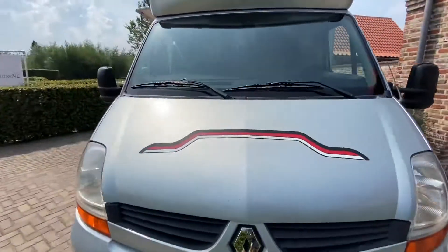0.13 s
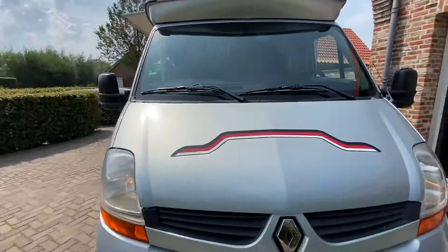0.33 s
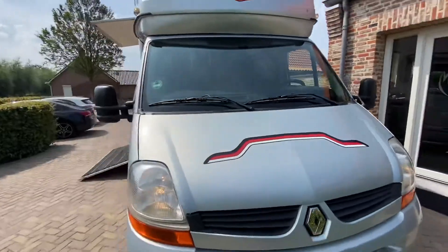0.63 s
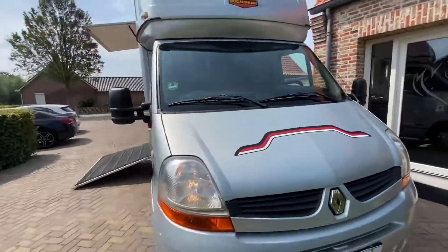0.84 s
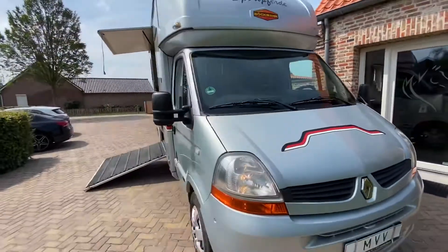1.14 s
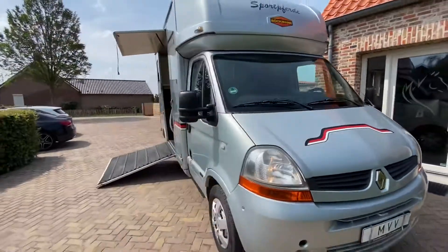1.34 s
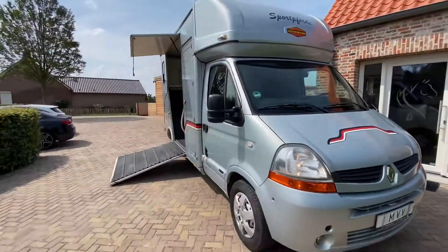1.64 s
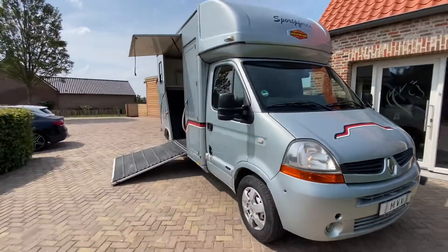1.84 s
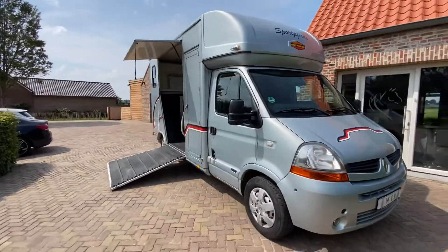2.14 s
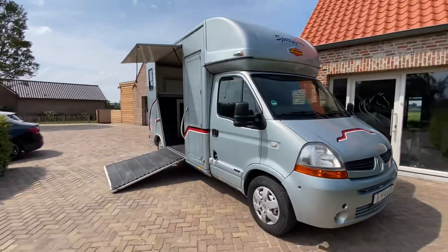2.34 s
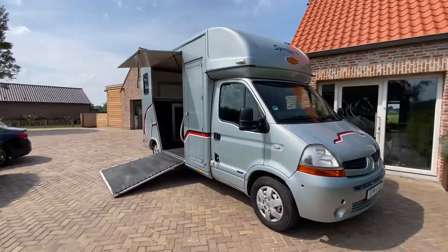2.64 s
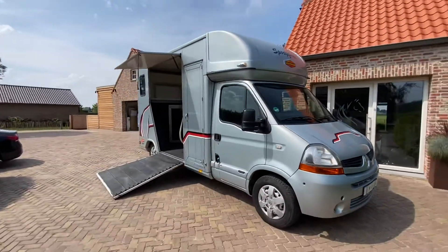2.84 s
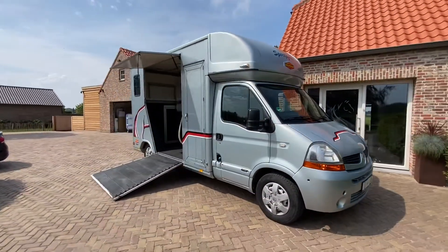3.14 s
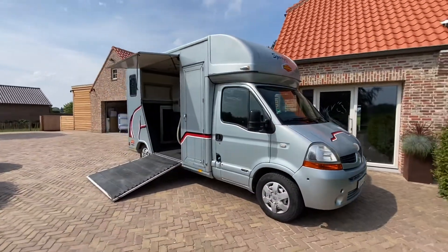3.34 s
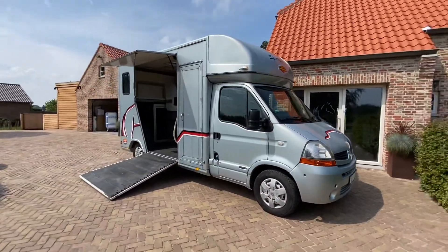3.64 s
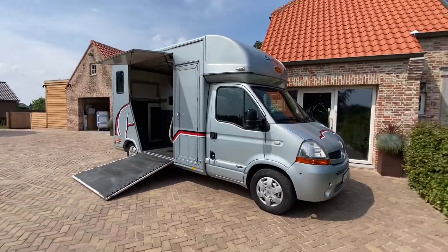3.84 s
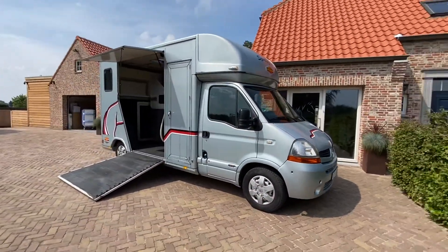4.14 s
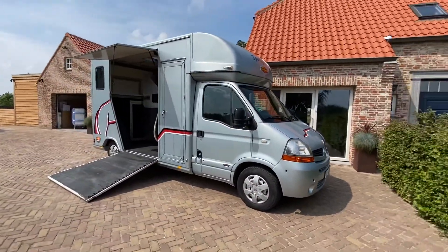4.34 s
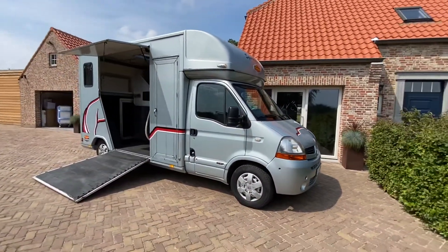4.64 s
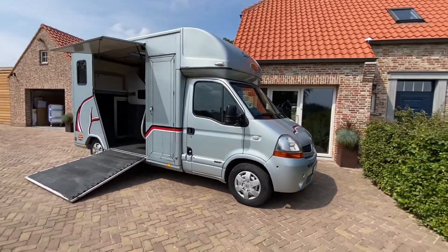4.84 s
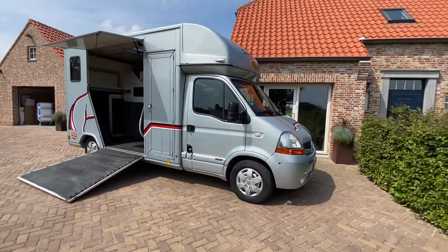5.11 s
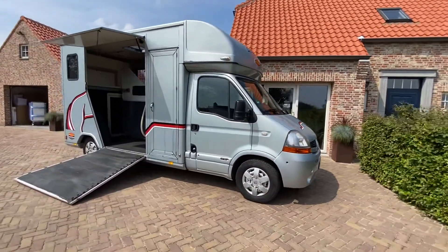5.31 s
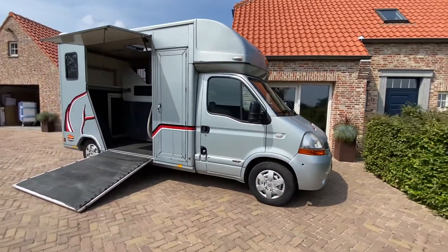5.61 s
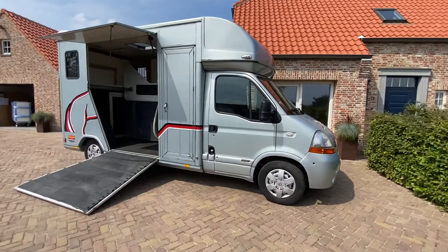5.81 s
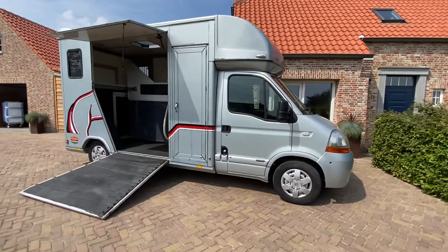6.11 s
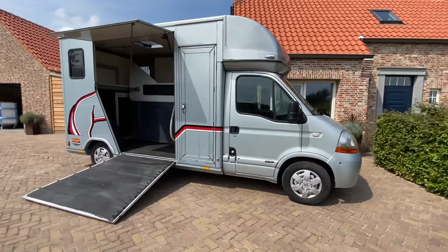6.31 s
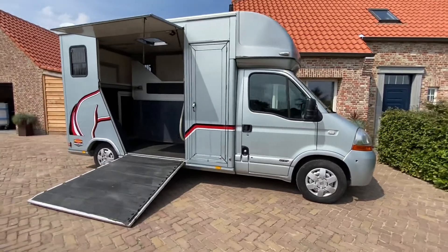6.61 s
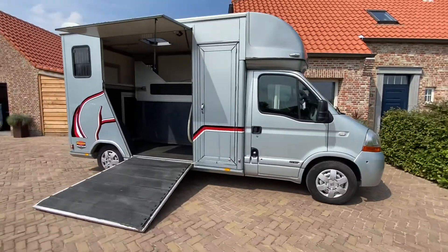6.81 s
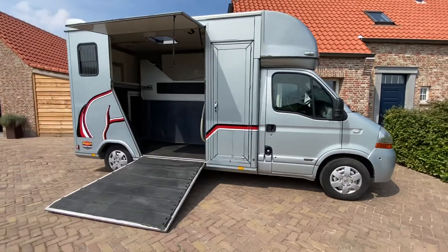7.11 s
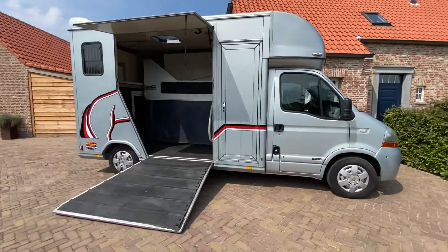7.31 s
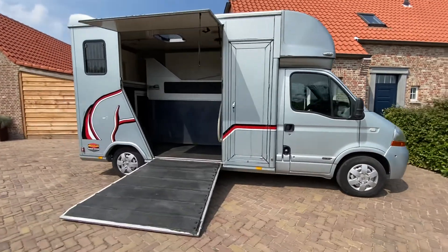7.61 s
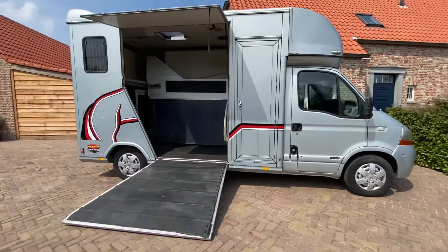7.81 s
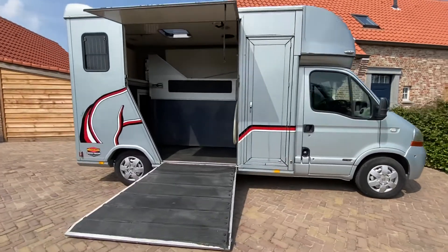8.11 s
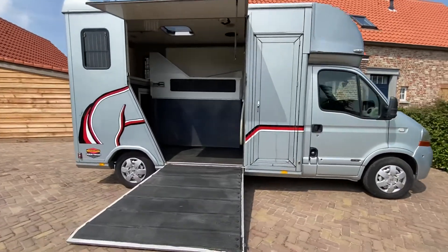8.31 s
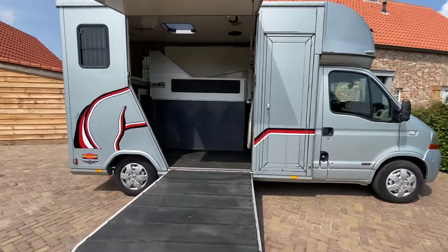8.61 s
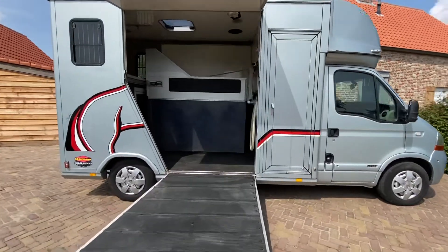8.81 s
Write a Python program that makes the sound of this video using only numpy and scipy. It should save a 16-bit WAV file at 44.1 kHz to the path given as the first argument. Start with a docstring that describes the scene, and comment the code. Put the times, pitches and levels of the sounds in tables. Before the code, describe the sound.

A four-cylinder diesel van idles at about 800 rpm throughout, roughly 27 firings a second, each a small boom with metallic clatter and injector hiss. At 0 s the portable stereo microphone is close to the bonnet: loud, rattly and bright, with a sharp gritty click, scuff and hard knock around 0.1 s. Low wind rumble buffets each side separately, with gusts at 0.1 and 0.8-1.45 s, then stops. A thin fluttering pulley whine near 1270 Hz sings from 0.5 to 1.5 s. From 1.3 to 3 s the engine recedes and a hollow throb, nearly seven per second, emerges, rising slightly in pitch later. Gritty steps scuff and click near 1.7, 2.4, 2.9, 3.4 and 3.8 s, with dull knocks at 2.4, 3.86 and 4.2 s. Quieter steps follow at 5.9, 6.5 and 7.1 s; small knocks and scuffs cluster at 7.7-8.5 s, and a last click-scuff comes at 8.8 s, the idle continuing.

```python
"""On a brick yard a four-cylinder diesel van idles while someone walks from its bonnet round to its side.
Every firing booms and clatters: tones locked to the crankshaft, and noise that swells with each ignition.
Once a cycle a resonance gives a hollow throb; a knock and a pulley whine are strongest near the bonnet.
Gusts rumble on the microphone at first as low noise, apart at each port.
Shoes scuff and click on gritty paving: friction noise and ringing grains, with short hollow knocks."""
import sys
import numpy as np
from scipy import signal
from scipy.fft import rfft, irfft, next_fast_len
from scipy.io import wavfile

SR = 44100
rng = np.random.default_rng(int(sys.argv[2]) if len(sys.argv) > 2 else 0)


def unload_audio(sound):
    """Save the sound as a 16-bit wav file, at the path given as the first command line argument."""
    columns = np.transpose(np.atleast_2d(sound))
    # keep every value between -1 and 1, then stretch to whole-number steps
    steps = np.round(np.clip(columns, -1, 1) * 32767)
    wavfile.write(sys.argv[1], SR, steps.astype(np.int16))


N = 394694
TIME_S = np.arange(N) / SR
PADDED = next_fast_len(N, True)          # samples in a spectrum
SIDES = np.array([[.5], [-.5]])          # shares a left-right difference between the two ports

IDLE_RPM = 799.1
CYCLE_HZ = IDLE_RPM / 120                # a four-stroke cycle takes two revolutions

# Strength of the four firings, one per cylinder. Each entry: relative level in dB.
CYLINDER_DB = [-6.5, -7.5, -6.5, -7.5]
# Level difference of the two microphone ports. Each row: frequency in Hz, left over right in dB.
LEAN_DB = [(60, -1.5), (99, -2), (160, -1.5), (270, -0.5), (450, -3.5), (740, -5.5), (1220, -6), (2010, -5),
           (3330, 2), (5500, 6.5), (9080, -0.5), (15000, 0.5)]
# Phase difference of the two microphone ports. Each row: frequency in Hz, left's lead in radians.
LEAD_RAD = [(60, -0.16), (250, -0.49), (480, -1.69), (1000, -2.02), (1700, -1.4), (2700, -1.02),
            (5000, -1.56), (14000, -1)]


def from_db(db):
    """Decibels to gain."""
    return 10 ** (np.asarray(db) / 20)


def rms_one(x):
    """Scale so that the centre of the stereo image has rms 1."""
    centre = np.atleast_2d(x).mean(axis=0)
    return x / np.sqrt(np.mean(centre ** 2) + 1e-20)


def in_time(rows):
    """Each column of a curve table at every sample."""
    s, *columns = np.transpose(rows)
    return [np.interp(TIME_S, s, column) for column in columns]


def at_hz(points, hz):
    """Read a table on a log-frequency axis."""
    table_hz, values = np.transpose(points)
    return np.interp(np.log(hz + 1e-9), np.log(table_hz), values)


def drift(rate):
    """Smooth chance with a spread near 1; rate is random points a second."""
    knots = rng.standard_normal(int(N / SR * rate) + 2)
    return np.interp(TIME_S * rate, np.arange(len(knots)), knots)


def bins():
    """Frequencies of the padded spectrum in Hz."""
    return np.arange(PADDED // 2 + 1) * SR / PADDED


def colour(spectrum):
    """Gain per frequency, falling steeply beyond the ends of the table."""
    hz = bins() + 1
    skirts = np.minimum(hz / spectrum[0][0], 1) * np.minimum(spectrum[-1][0] / hz, 1)
    return from_db(at_hz(spectrum, hz)) * skirts ** 8


def noise(gain, repeating=0):
    """Coloured noise as the two ports hear it: a direct part with a phase lag, and a diffuse part."""
    # How alike the ports hear. Each row: frequency in Hz, direct share of the power from 0 to 1.
    likeness = [(50, 0.85), (270, 0.92), (500, 0.77), (1100, 0.81), (2000, 0.95), (4000, 0.31),
                (9000, 0.52), (14000, 0.52)]
    hz = bins()
    alike = np.clip(at_hz(likeness, hz), 0, 1)
    source = rms_one(rng.standard_normal(N) + repeating)
    direct = rfft(source, PADDED) * np.exp(1j * SIDES * at_hz(LEAD_RAD, hz))
    diffuse = rfft(rng.standard_normal((2, PADDED)))
    both = np.sqrt(alike) * direct + np.sqrt(1 - alike) * diffuse
    leaning = from_db(SIDES * at_hz(LEAN_DB, hz))
    return rms_one(irfft(both * gain * leaning, PADDED)[:, :N])


def tone(turns, hz):
    """A sine of rms 1 ahead of the ports' level difference; turns is its running phase."""
    angle = (2 * np.pi * (turns % 1) + SIDES * at_hz(LEAD_RAD, hz)).astype(np.float32)
    return np.sqrt(2) * np.sin(angle) * from_db(SIDES * at_hz(LEAN_DB, hz))


def beam(at_s, spread_s, fade_db=11.0):
    """A part is loudest as the listener passes the spot that it faces."""
    off_axis = (TIME_S[::100] - at_s) / spread_s   # one value per 100 samples
    return np.repeat(from_db(-fade_db * np.log1p(off_axis ** 2)), 100)[:N]


def engine_tones(cycles):
    """Exhaust pulses and buzzing panels hold lines locked to the crankshaft; equal lines share a phase."""
    # Exhaust boom, twice a firing. Each row: time in seconds, level in dB.
    boom = [(0, -34), (1.3, -40.5), (1.55, -53), (2, -48), (2.25, -43.5), (5, -51.5), (6.3, -56.5),
            (7.9, -44.5), (8.95, -41.5)]
    # Buzzing parts, each loudest at its own spot along the walk.
    # Each row: multiple of the cycle rate, level in dB, loudest at in seconds, spread in seconds.
    harmonics = [(4, -53.5, .43, 4.5), (11, -56, 3, 1.6), (12, -44, .9, .6), (12, -52, 2.6, 2.7),
                 (12, -53.5, 7.3, 2.2), (16, -52, 6.3, 1.8), (20, -57, 6.9, 3), (23, -53, 3.6, 3),
                 (34, -39.5, .45, .45), (34, -51, 6.5, .9), (34, -51.5, 8.5, .9), (40, -49, .9, 1.2),
                 (40, -48.5, 6.2, 2.6), (44, -56, 2.6, 2.3), (48, -48.5, 2.3, 1.7), (52, -46, .25, .5),
                 (52, -51, 2.6, 2.6), (56, -49, .2, .8), (56, -56.5, 6.2, 3), (66, -61, 7.8, 2),
                 (76, -49, .3, .8), (76, -52, 3.8, 2.5), (96, -56.5, 4.8, 1.8), (112, -61, 4, 1.4)]
    standing_wave_db, standing_waves_per_s = 1.8, 2.5   # the lines swell and fade gently
    phases = rng.random(200)
    order = 2 * len(CYLINDER_DB)
    out = from_db(in_time(boom)[0]) * tone(order * cycles + phases[order], order * CYCLE_HZ)
    for order, level_db, at_s, spread_s in harmonics:
        swell_db = standing_wave_db * drift(standing_waves_per_s)
        gain = from_db(level_db + swell_db) * beam(at_s, spread_s)
        out = out + gain * tone(order * cycles + phases[order], order * CYCLE_HZ)
    return out


def firing_gate(cycles, delay, rise, fall, rest, uneven_db, pattern=CYLINDER_DB):
    """Each firing swells and dies over a steady rest; times are shares of the firing interval."""
    firings = len(pattern) * cycles - delay + len(pattern)
    which, age = firings.astype(int), firings % 1
    chance_db = uneven_db * rng.standard_normal(N // 100)[which]
    strength = from_db(np.take(pattern, which, mode="wrap") + chance_db)
    return rms_one(rest + strength * (1 - np.exp(-age / rise)) * np.exp(-age / fall))


def carried(source):
    """Gain of an engine noise along the walk: it loses a fixed amount each time the distance doubles."""
    # The walk away from the engine bay. Each row: time in seconds, distance in metres.
    walk = [(0, 1.17), (.3, 1.13), (1.25, 1.86), (2.1, 2.94), (3, 3.63), (5.3, 3.85), (7.3, 5.3),
            (8.95, 5.6)]
    near_db, loss_db = source
    distance_m = np.maximum(in_time(walk)[0], .1)
    return from_db(near_db - loss_db * np.log2(distance_m))


def shifting(spectrum, repeating, depth_db, spacing_hz):
    """Countless small resonances make the colour uneven; its peaks and dips wander between two patterns."""
    knots = np.tanh(rng.standard_normal(4000))
    ripple = from_db(depth_db * np.interp(bins() / spacing_hz, np.arange(len(knots)), knots))
    peaks = noise(colour(spectrum) * ripple, repeating)
    dips = noise(colour(spectrum) / ripple, repeating)
    turn = 1.3 * drift(2.5)
    return np.cos(turn) * peaks + np.sin(turn) * dips


def tapping():
    """Each ignition sets off a bunch of metal taps, uneven in strength, that start at once and die fast."""
    # How hard each cylinder knocks. Each entry: relative level in dB.
    tap_cylinder_db = [0, -2.5, .5, .5]
    # Contacts bunched after each ignition. Each row: share of the firing interval, relative level in dB.
    taps = [(.04, -7), (.17, -6), (.36, -7.5)]
    decay_s, jitter_s, uneven_db = .008, .001, 1.1
    rest = 1.2   # steady rattle relative to the rms of the taps
    firing_s = 1 / (len(CYLINDER_DB) * CYCLE_HZ)
    starts, hits = np.arange(0, N / SR, firing_s), np.zeros(N + SR)
    chance = np.clip(rng.standard_normal(len(starts)), -2, 1)
    firing_db = np.resize(tap_cylinder_db, len(starts)) + uneven_db * chance
    for share, level_db in taps:
        late, strong = rng.standard_normal((2, len(starts)))
        at_s = np.abs(starts + share * firing_s + jitter_s * late)
        tap_db = level_db + firing_db + uneven_db * np.minimum(strong, 2)
        hits[(at_s * SR).astype(int)] += from_db(tap_db) ** 2
    power = signal.lfilter([1], [1, -np.exp(-2 / (decay_s * SR))], hits[:N] + 1e-18)
    return rms_one(np.sqrt(rest ** 2 + power / power.mean()))


def engine_rings():
    """Shaken parts ring in narrow bands, their strength and phase wandering at the pace of their width."""
    # Ringing engine parts. Each row: frequency in Hz, width in Hz, level in dB ahead of the wandering,
    # loudest at in seconds, spread in seconds.
    rings = [(802, 30, -40, .15, .27), (660, 110, -48, 4.1, 2.3), (691.5, 100, -53, 7.8, 2.2),
             (1041, 250, -44, .45, 1.4), (1550, 300, -45.5, .15, .4), (1290, 70, -48, .6, .5),
             (1046, 180, -56, 5.6, 1.4), (1295, 55, -59.5, 4.6, 2.9), (4350, 68, -64.5, .75, 1.5),
             (4850, 400, -67, 12, 13)]
    diffuse = .3   # share of the power that reaches each port on its own
    out = 0
    for hz, width_hz, level_db, at_s, spread_s in rings:
        gain = from_db(level_db) * beam(at_s, spread_s)
        for quarter in (0, 1 / 4):   # two carriers a quarter turn apart let the phase wander too
            shared, *own = (drift(2 * width_hz) for _ in range(3))
            wander = np.sqrt(1 - diffuse) * shared + np.sqrt(diffuse) * np.array(own)
            out = out + gain * wander * tone(hz * TIME_S + quarter, hz)
    return out


def engine_noise(cycles):
    """Combustion shakes the block; valves and injectors make much the same rattle on every cycle."""
    # Noise colours from low to high. Each row: frequency in Hz, relative level in dB.
    low = [(40, -10), (65, -1), (100, -3.5), (140, 0), (185, 3.5), (260, -2.5), (340, -15), (420, -44)]
    middle = [(310, -2.5), (350, -4), (400, -3.5), (490, -2), (560, -4), (660, -6), (760, -8.5),
              (840, -11.5), (950, -11.5)]
    clatter_colour = [(820, -3), (950, -4), (1150, 1.5), (1300, 1.5), (1450, -5), (1700, -3), (2100, -5.5),
                      (2350, -7), (2600, -9), (3100, -32)]
    hiss_colour = [(2900, 7), (3300, 4.5), (3700, 0), (4300, 2), (5000, 1.5), (6500, -2.5), (7400, -8.5),
                   (8600, -8.5), (10100, -7.5), (11000, -11.5)]
    air_colour = [(9000, -5), (11000, 9), (14000, 22), (16000, 2)]
    # Loss over distance, one pair per noise: level in dB at 1 m ahead of the firing swells,
    # dB lost each time the distance doubles.
    rumble_reach = (-37.5, 3.47)
    growl_reach = (-34.5, 6.96)
    clatter_reach = (-39.5, 5.17)
    hiss_reach = (-46.5, 4.82)
    # Ignition slap in each cylinder. Each entry: relative level in dB.
    slap_db = [1, -3.5, 5.5, 2.5]
    size = round(SR / CYCLE_HZ)
    rattle = rng.standard_normal(size)[(cycles % 1 * size).astype(int)]   # the same on every cycle
    # a negative delay comes early
    thump = firing_gate(cycles, delay=-.036, rise=.079, fall=.54, rest=.38, uneven_db=1.0)
    knock = firing_gate(cycles, delay=-.07, rise=.15, fall=.36, rest=.48, uneven_db=1.2)
    tick = firing_gate(cycles, delay=-.1, rise=.25, fall=.3, rest=.24, uneven_db=1.8)
    # ignition itself is a slap of a few milliseconds
    slap = firing_gate(cycles, delay=-.0009, rise=.02, fall=.036, rest=0, uneven_db=.5, pattern=slap_db)
    rumble = carried(rumble_reach) * noise(colour(low), .45 * rattle)
    growl = carried(growl_reach) * noise(colour(middle), 1.05 * rattle)
    clatter = carried(clatter_reach) * shifting(clatter_colour, .7 * rattle, depth_db=6.5, spacing_hz=45)
    injectors = shifting(hiss_colour, .45 * rattle, depth_db=5.0, spacing_hz=60)
    air = from_db(-15.0) * noise(colour(air_colour))
    hiss = carried(hiss_reach) * (injectors + air)
    block = thump * rumble + np.hypot(thump, .25 * slap) * growl
    return block + tapping() * clatter + knock * engine_rings() + tick * hiss


def wind(lump_db=2.5):
    """Eddies buffet each port on its own: a breeze, and gusts that swell, hold and die."""
    # Colour of the buffeting. Each row: frequency in Hz, relative level in dB.
    buffeting = [(15, -19), (30, -10), (60, 5.5), (90, 4.5), (130, -4), (200, -1.5), (300, -10.5),
                 (600, -40)]
    # Gusts on the microphone. Each row: fully swollen at in seconds, hold in seconds, level in dB,
    # left over right in dB.
    gusts = [(0.145, 0.037, -32.5, -3), (0.83, 0.057, -31.5, 3), (0.963, 0.13, -33, 14.5),
             (1.133, 0.06, -46, -1.5), (1.213, 0.029, -37, 12), (1.275, 0.065, -33.5, 10),
             (1.349, 0.022, -27.5, 11.5), (1.422, 0.073, -37.5, 11)]
    attack_s, release_s = .018, .037
    breeze_db, breeze_ends_s, breeze_fade_s = -38, 1.45, .03   # until the van gives shelter
    white = rfft(rng.standard_normal((2, PADDED)))
    eddies = rms_one(irfft(white * colour(buffeting), PADDED)[:, :N])
    shelter = (1 - np.tanh((TIME_S - breeze_ends_s) / breeze_fade_s)) / 2
    power = (from_db(breeze_db) * shelter) ** 2
    for s, hold_s, level_db, pan_db in gusts:
        swell = np.clip((TIME_S - s) / attack_s + 1, 0, 1)
        dying = np.exp(-np.clip((TIME_S - s - hold_s) / release_s, 0, 20))
        power = power + (from_db(level_db + pan_db * SIDES) * swell * dying) ** 2
    return np.sqrt(power) * from_db(lump_db * drift(30.7)) * eddies


def grit(count=36):
    """Spectrum of sand cracking: grains ping at one of many pitches and reach the two ports unequally."""
    grains_per_s, spread_db = 11000, 2.8
    ring_cycles = 8   # cycles for a grain to fall to a third
    out, total = np.zeros((2, N)), int(grains_per_s * N / SR / count)
    for hz in np.geomspace(600, 14500, count):
        at, cracks = rng.integers(0, N, total), np.full((2, N), 1e-18)
        strength_db = spread_db * np.minimum(rng.exponential(1, total), 4)
        push = from_db(strength_db) * rng.choice([-1, 1], total)
        cracks[:, at] = push * (1 + .68 * rng.standard_normal((2, total)))
        r, w = np.exp(-hz / (ring_cycles * SR)), 2 * np.pi * hz / SR
        out += signal.lfilter([1 - r, 0, r - 1], [1, -2 * r * np.cos(w), r * r], cracks)
    return rfft(out, PADDED) * from_db(SIDES * at_hz(LEAN_DB, bins()))


def footsteps(tail_s=.0097, catch_db=2.0, yard_db=-19, yard_s=.12, ripple_db=2.5):
    """Soles press, drag over cracking sand and lift; heels click and the walls answer faintly."""
    # Soles sliding on grit. Each row: start in seconds, nominal length in seconds, level in dB,
    # share of bright sand from 0 to 1.
    scuffs = [(0.073, 0.084, -38, 1), (1.687, 0.038, -36, 0.99), (1.724, 0.19, -53.5, 1),
              (2.424, 0.029, -43, 0.04), (2.825, 0.078, -48.5, 0.6), (2.932, 0.039, -49, 0),
              (2.988, 0.058, -47.5, 0.08), (3.371, 0.098, -43, 0.6), (3.822, 0.081, -47, 0.7),
              (3.836, 0.059, -38.5, 0.09), (5.88, 0.033, -52, 0.6), (6.477, 0.19, -48.5, 0.1),
              (7.104, 0.14, -47.5, 0.2), (7.655, 0.047, -47.5, 0.26), (7.72, 0.13, -54.5, 0.7),
              (8.342, .06, -55, 0.35), (8.399, 0.039, -47.5, 0.13), (8.773, 0.19, -53.5, 1)]
    # Heel clicks and cracking grit. Each row: start in seconds, level in dB,
    # share of bright sand from 0 to 1, decay in seconds.
    clicks = [(.062, -32, 0.9, 0.0083), (1.247, -37, 1, 0.0013), (1.685, -37, 0.8, 0.0041),
              (2.402, -41.5, 0.8, 0.0033), (2.459, -45, 0.6, .003), (2.826, -45, 1, .003),
              (2.956, -45, 0.4, 0.0035), (3.466, -44, 1, .004), (5.903, -39.5, 0.6, 0.0026),
              (7.672, -53, 0.16, 0.012), (8.342, -48.5, 1, 0.0073), (8.364, -49, 0.5, 0.0044),
              (8.781, -36.5, 0.4, 0.0072)]
    # Colours of the dull sole and the bright sand. Each row: frequency in Hz, relative level in dB.
    sole_colour = [(400, 7), (900, 6), (1700, 9.5), (2600, 3.5), (4000, 1), (7000, -11.5), (15000, -33)]
    sand_colour = [(1200, -18), (3000, 10.5), (5000, 10), (7000, 9.5), (9500, 6), (11000, 0.5), (15000, -4)]
    rubbing = .8   # smooth friction of the sole, relative to the cracking grit
    drag, click = np.zeros((2, 2, N))   # power of each, in rows of sole and sand
    catching = rms_one(from_db(catch_db * drift(110)))
    for s, length_s, level_db, sand in scuffs:
        near = slice(int(s * SR), int(s * SR) + SR // 2)
        age = np.maximum(TIME_S[near] - s, 0)
        press = 1 - np.exp(-age / (.27 * length_s))
        lift = np.exp(-np.maximum(age - .64 * length_s, 0) / (tail_s + .27 * length_s))
        drag[:, near] += np.outer([1 - sand, sand], (from_db(level_db) * press * lift * catching[near]) ** 2)
    for s, level_db, sand, decay_s in clicks:
        near = slice(int(s * SR), int(s * SR) + SR // 2)
        age = np.maximum(TIME_S[near] - s, 0)
        shape = np.exp(-age / decay_s) + from_db(yard_db) * np.exp(-age / yard_s)
        click[:, near] += np.outer([1 - sand, sand], (from_db(level_db) * shape) ** 2)
    grains, out = grit(), 0
    # an uneven colour, shared by clicks and friction
    uneven = np.interp(bins(), np.linspace(0, SR / 2, 70), rng.standard_normal(70))
    ripple = from_db(ripple_db * uneven)
    for k, spectrum in enumerate((sole_colour, sand_colour)):
        crunch = rms_one(irfft(grains * colour(spectrum), PADDED)[:, :N])
        friction = noise(colour(spectrum) * ripple)
        out = out + np.sqrt(drag[k]) * rms_one(crunch + rubbing * friction)
        out = out + np.sqrt(click[k]) * friction
    return out


def knocks(attack_s=.0004):
    """Something hard is nudged and rings briefly; a harder contact wakes more of its upper modes."""
    # Short hollow knocks. Each row: start in seconds, pitch in Hz, level in dB ahead of summing the modes,
    # decay in seconds, slope of the upper modes in dB per octave.
    nudges = [(.088, 2400, -27, 0.006, -7), (2.403, 1150, -32.5, .0025, -10),
              (3.857, 950, -29.5, 0.004, -10), (4.211, 750, -32, 0.0031, -7),
              (7.673, 1810, -37.5, 0.009, -9), (7.688, 2400, -42.5, .011, -14),
              (7.883, 1198, -40.5, .022, -22), (8.288, 950, -31.5, 0.0032, -19),
              (8.297, 1750, -40.5, .006, -18), (8.367, 800, -32, 0.004, -7), (8.381, 1600, -40, .004, -16),
              (8.393, 1600, -40, .009, -16), (8.484, 1280, -41.5, 0.007, -16)]
    # Modes of the knocked thing. Each entry: multiple of the pitch.
    mode_ratios = [0.996, 1.6, 1.92, 2.44, 3.05]
    out, age = np.zeros((2, N + SR)), np.arange(SR // 5) / SR
    for s, hz, level_db, decay_s, tilt_db in nudges:
        modes = 0
        for ratio in mode_ratios:   # each mode starts at a phase of its own
            mode = tone(ratio * hz * age + rng.random(), ratio * hz)
            modes = modes + from_db(tilt_db * np.log2(ratio)) * mode
        shape = (1 - np.exp(-age / attack_s)) * np.exp(-age / decay_s)
        start = int(s * SR)
        out[:, start:start + len(age)] += from_db(level_db) * shape * modes
    return out[:, :N]


def seconds_from(cycles, place):
    """Time in seconds from the nearest passing of a place (0-1) in the engine cycle."""
    return ((cycles - place + .5) % 1 - .5) / CYCLE_HZ


def engine_clonk(cycles):
    """Once a cycle one cylinder knocks hollowly, a burst of noise heard close to the bonnet."""
    # Colour of the knock. Each row: frequency in Hz, relative level in dB.
    clonk_colour = [(820, -6.5), (920, -2.5), (1030, -2)]
    level_db, loudest_s, spread_s = -40, .69, .99
    swell = np.exp(-.5 * (seconds_from(cycles, .8) / .011) ** 2)   # spread .011 s
    return from_db(level_db) * beam(loudest_s, spread_s) * swell * noise(colour(clonk_colour))


def engine_throb(cycles):
    """Once a cycle the rocking engine sets a hollow resonance swelling and dying."""
    # The throb is faint at the bonnet, full along the side and higher by the open load door.
    # Each row: time in seconds, level in dB relative to full, pitch in Hz.
    throb = [(.7, -20, 184), (1.7, -8, 182), (2.2, -2, 181), (4.5, -2.5, 183), (7, -1.5, 196)]
    full_db, uneven_db = -34, .5
    level_db, pitch_hz = in_time(throb)
    age = seconds_from(cycles, .852)
    swell = np.exp(-.5 * (age / .0095) ** 2)   # spread .0095 s
    gain = from_db(full_db + level_db + uneven_db * drift(CYCLE_HZ))
    return gain * swell * tone(pitch_hz * age, np.mean(pitch_hz))


def engine_whine():
    """A pulley sings on one fluttering, slightly unsteady note."""
    # The whine as the listener passes the corner of the bonnet.
    # Each row: time in seconds, level in dB, pitch in Hz.
    whine = [(.42, -62, 1250), (.54, -42.5, 1260), (.75, -39, 1285), (1.1, -39.5, 1270),
             (1.38, -42.5, 1270), (1.5, -56, 1275), (2, -72, 1275)]
    wobble_hz, flutter_db = 15, 2.2
    level_db, pitch_hz = in_time(whine)
    turns = np.cumsum(pitch_hz + wobble_hz * drift(60)) / SR
    return from_db(level_db + flutter_db * drift(35)) * tone(turns, np.mean(pitch_hz))


def scene():
    """The idling van, the gusts, the steps and the knocks."""
    # engine cycles gone by; the governor lets the speed wander slightly
    cycles = CYCLE_HZ * TIME_S + .001 * drift(1.5)
    engine = engine_tones(cycles) + engine_noise(cycles)
    engine = engine + engine_clonk(cycles) + engine_throb(cycles) + engine_whine()
    return engine + wind() + footsteps() + knocks()


def record(dry):
    """The treble has a narrow dip, and the top is cut."""
    notch = signal.butter(2, [11500, 12900], "bandstop", fs=SR, output="sos")
    top = signal.ellip(10, .3, 80, 15500, fs=SR, output="sos")   # cut above 15500 Hz
    return signal.sosfilt(top, signal.sosfilt(notch, dry))


dry = scene()
out = record(dry)
unload_audio(out)
```